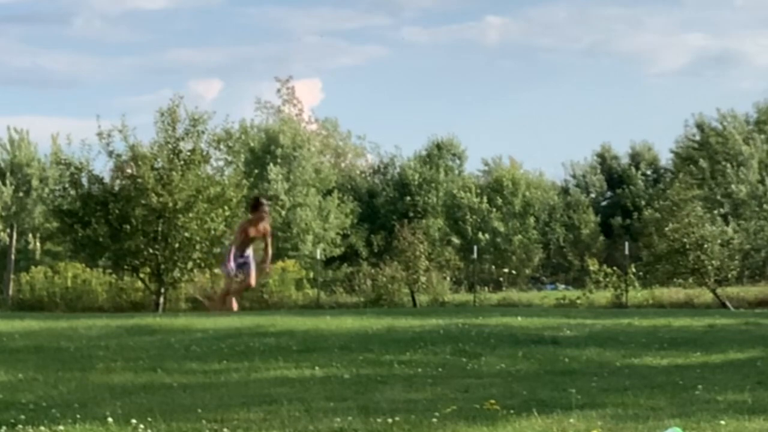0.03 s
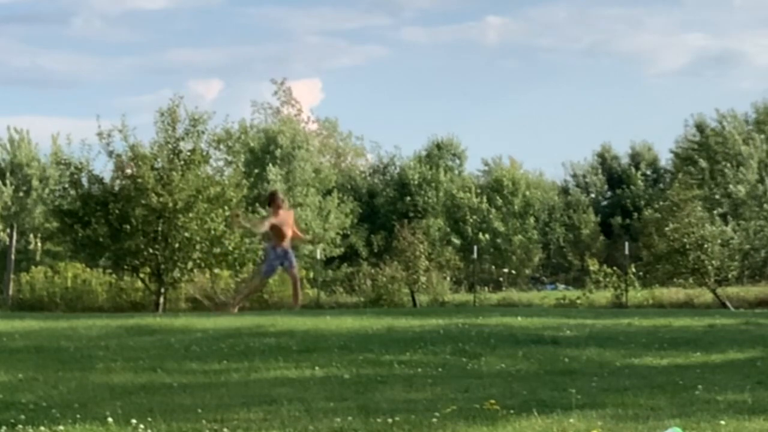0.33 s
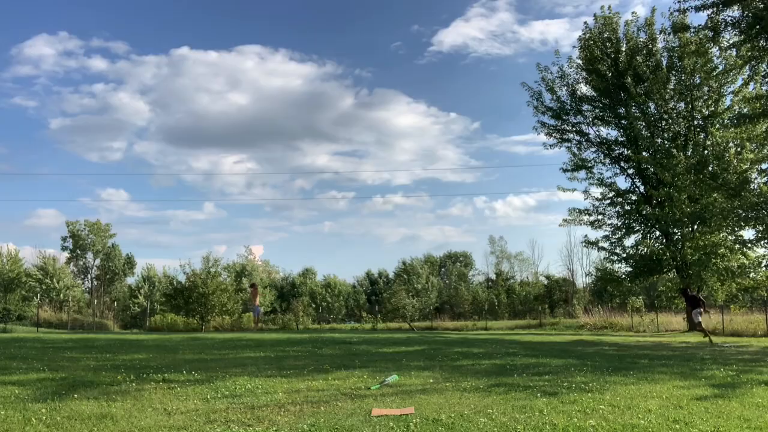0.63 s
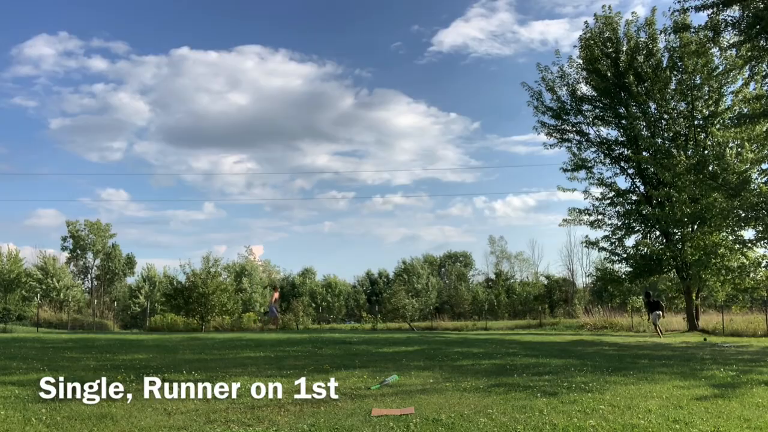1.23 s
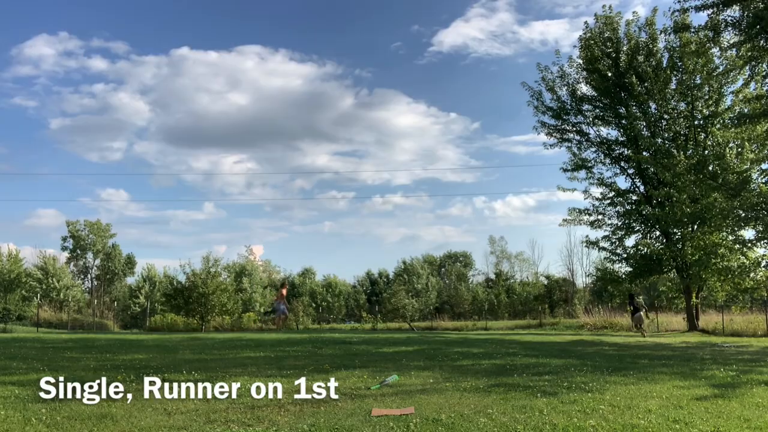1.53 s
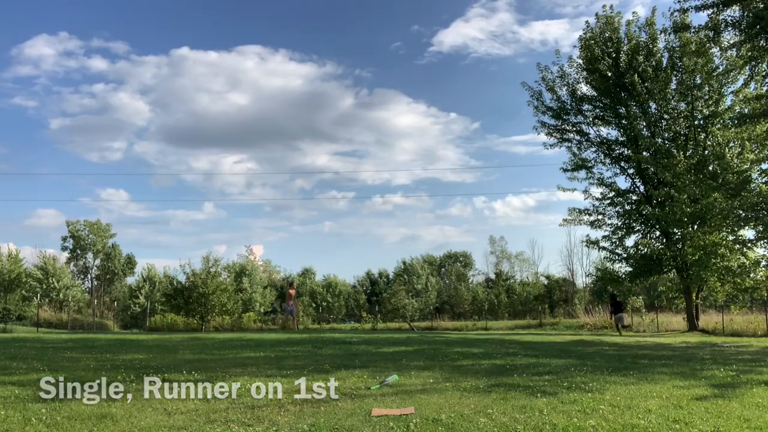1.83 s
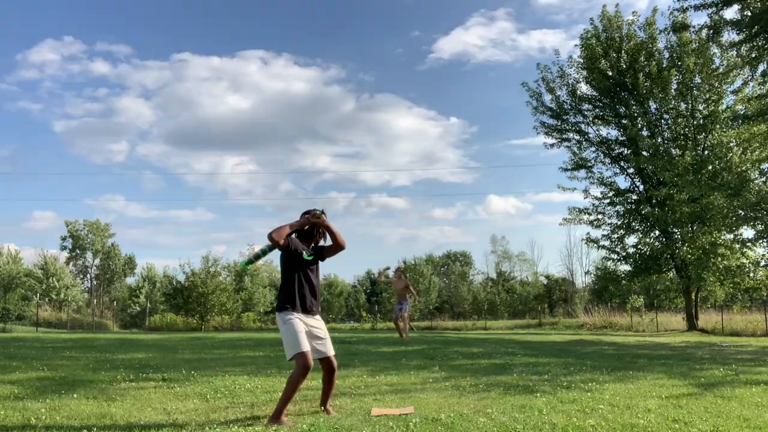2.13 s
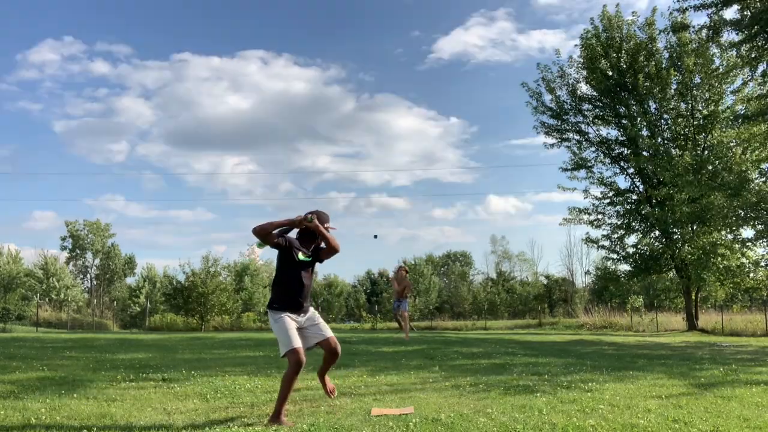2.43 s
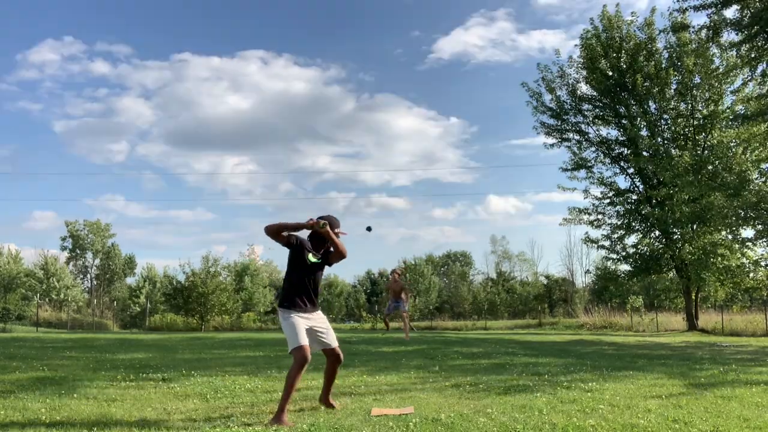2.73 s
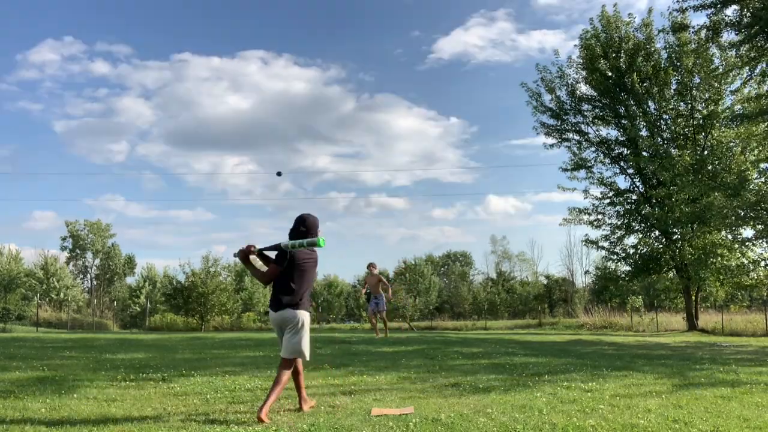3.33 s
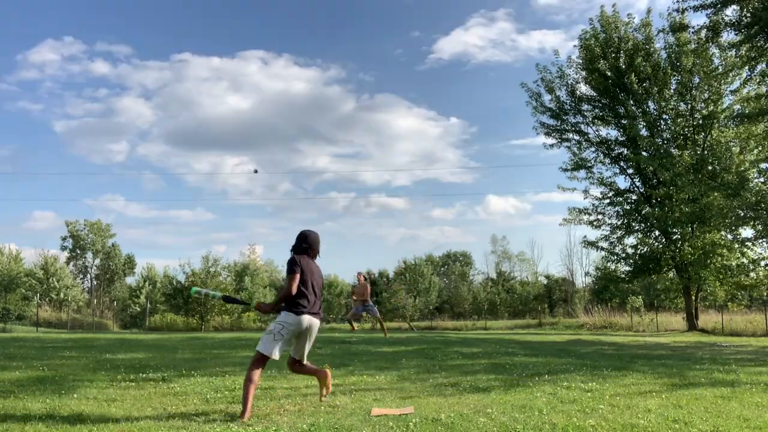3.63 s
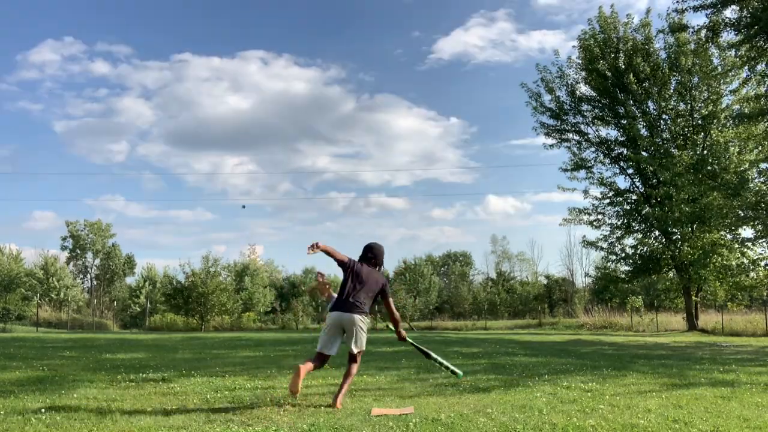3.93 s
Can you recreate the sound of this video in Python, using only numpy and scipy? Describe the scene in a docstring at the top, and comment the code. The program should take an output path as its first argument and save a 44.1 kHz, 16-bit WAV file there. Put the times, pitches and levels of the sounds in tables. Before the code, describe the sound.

One sharp, close crack of a bat on a plastic ball comes near the end, echoing briefly. Soft barefoot steps on a lawn come before and after, over faint crickets, a fading far engine and low outdoor rumble.

```python
"""A bat cracks a hollow plastic ball: both ring for a moment, and lawn and trees scatter the sound back.
Bare feet thud on the summer lawn and swish through the grass. Crickets trill, one pulse to a wing stroke.
Far off, an engine hums and slows, a faint tone pulses and a low drone comes up.
The open air rumbles and hisses under it all. Halfway through, the whole sound dips briefly."""
import sys
import numpy as np
from scipy import signal
from scipy.fft import rfft, irfft, next_fast_len
from scipy.io import wavfile
from scipy.ndimage import map_coordinates

SR = 44100
rng = np.random.default_rng(int(sys.argv[2]) if len(sys.argv) > 2 else 0)


def dump_mix(stems):
    """Bounce the given channels to the path in sys.argv[1] as a 16-bit WAV at rate SR."""
    frames = np.atleast_2d(stems).T  # one column per channel
    limited = np.clip(frames, -1, 1)  # hard clip at full scale
    pcm = np.round(limited * 32767).astype(np.int16)
    wavfile.write(sys.argv[1], SR, pcm)


N = 176400
T = np.arange(N) / SR
HIT_S, DIP_S = 3.0505, 2.003  # when the bat meets the ball; when the sound dips

# The notes that ball and bat ring with (pitch [Hz], level [dB], time to fade by 60 dB [s])
RING_NOTES = [(238, -20, .034), (363, -9.7, .02), (683, -9, .0105), (1022, -2.5, .016), (1222, 3.8, .0085),
              (1470, -17, .014), (1744, -12, .026), (2200, -17, .016), (2610, 2.5, .005),
              (2790, -15.5, .019), (3390, -14, .018), (3535, -21.5, .029), (4260, -22, .011),
              (4435, -12, .0086), (4755, -27, .018), (5540, -28, .028), (5690, -27, .017),
              (6900, -21, .0115), (7450, -18.5, .0125)]
# The tone colour of the crack: how strong its lows and highs are (frequency [Hz], level [dB])
CRACK_COLOUR = [(200, -24), (520, -21), (900, 2), (1500, -4.5), (3000, -8), (3700, -20), (4500, -11),
                (6200, -19), (7500, -2.5), (9000, -12.5), (10700, -4.5), (12200, -6), (13200, -4),
                (15200, -2.5), (16500, -13.5)]
# The colour of the sound bouncing off the ground close by (frequency [Hz], level [dB])
LAWN_COLOUR = [(200, -24), (520, -23.5), (900, 7.5), (1500, 0), (3000, -4), (4500, -4), (6200, -10),
               (7500, -1), (9000, -12), (11000, -3), (15000, -4.5), (16500, -14)]

def bat_hit():
    """The blow rings the hollow plastic for a few hundredths of a second, under a sharp crack."""
    ring = np.zeros(N)
    for hz, db, fade_s in RING_NOTES:
        start = HIT_S + 1 / hz  # low notes start later and swell more slowly
        envelope = burst(start, rise_s=2.36 / hz, fade_s=fade_s)
        ring += amp(db) * envelope * np.sin(2 * np.pi * hz * (T - start))
    crack = amp(-13.5) * burst(HIT_S, rise_s=0.00038, fade_s=0.0094) * noise(CRACK_COLOUR)
    lawn = amp(-25.5) * burst(HIT_S, rise_s=0.0021, fade_s=0.052) * noise(LAWN_COLOUR)
    return ring + crack + lawn


# How strongly the trees answer (time after the hit [s], level [dB])
ECHO_LEVEL = [(0, -11), (.02, -1), (.043, -8.5), (.065, -0.5), (.095, -4), (.118, -11.5), (.155, -8),
              (.18, -20), (.33, -56)]
# The colour of their echo (frequency [Hz], level [dB])
ECHO_COLOUR = [(300, -2.5), (700, -6.5), (1000, -1.5), (1450, -21), (1950, 5), (2200, -0.5), (3200, -0.5),
               (3520, 2.5), (3850, 0.5), (6400, -5), (8000, -4), (11000, -4), (15300, -12), (16500, -26)]
# The ring of the plastic inside the echo (pitch [Hz], width [Hz], level [dB])
ECHO_NOTES = [(1000, 110, -61), (1940, 200, -60), (3480, 300, -54)]
# That ring swells with the main echo (time after the hit [s], gain [factor])
ECHO_RING_SWELL = [(.045, 0.012), (.07, 0.67), (.098, 0.6), (.125, .25), (.18, 0.016)]

def tree_echo(blow):
    """Leaves and trunks return a bright, blurred echo that still rings, with one faint slap in it."""
    answer = amp(curve(ECHO_LEVEL, T - HIT_S)) * (T > HIT_S)
    leaves = amp(-48.5) * answer * noise(ECHO_COLOUR)
    side_tilt = [(4000, 5), (9000, -3), (13000, -24)]  # (frequency [Hz], level [dB])
    sides = amp(-50.5) * answer * filtered(noise(ECHO_COLOUR), lambda hz: amp(along(side_tilt, hz)))
    # The trunks send back many small copies of the blow, each with its own delay.
    paths = rng.standard_normal(SR // 2) * amp(curve(ECHO_LEVEL, T[:SR // 2]))
    trunks = amp(-33.5) * signal.fftconvolve(blow, paths / np.linalg.norm(paths))[:N]
    # The slap is one distinct copy from far away, late and thin.
    slap_delay_s = 0.156
    slap_tilt = [(1000, -17), (6000, 1)]  # (frequency [Hz], level [dB])
    slap = filtered(blow, lambda hz: amp(along(slap_tilt, hz)) * np.exp(-2j * np.pi * hz * slap_delay_s))
    notes = sum(amp(db) * fuzzy_tone(hz, width) for hz, width, db in ECHO_NOTES)
    ring = curve(ECHO_RING_SWELL, T - HIT_S) * notes
    return microphones(leaves + trunks + ring + amp(-33) * slap) + wide(0, sides)


# Bare feet landing (time [s], level [dB], pitch [Hz])
FOOTFALLS = [(.244, -44.5, 219), (.51, -50.5, 223), (0.865, -42.5, 174), (1.174, -45, 173),
             (1.191, -39.5, 85.6), (1.514, -34.5, 158.4), (1.854, -43.5, 146), (3.055, -34.5, 92),
             (3.338, -45, 85.6), (3.82, -44, 95.6)]
# The colour of the scuff in each step (frequency [Hz], level [dB])
SCUFF_COLOUR = [(60, -10), (300, -3.5), (500, -16), (900, -13.5), (1600, -23), (5000, -50)]
# Swishes through the grass (time [s], level [dB], rise and fall time [s])
GRASS_SWISHES = [(0.566, -71, 0.065), (1.053, -63, 0.0078), (1.435, -76, 0.023), (3.557, -73, 0.04),
                 (3.819, -72, 0.029), (3.906, -58, 0.017)]
# The colour of brushed blades of grass (frequency [Hz], level [dB])
GRASS_COLOUR = [(1500, -11), (6000, 5), (10000, 2), (15000, 3), (16500, -11)]
# The colour of a foot dragging over turf (frequency [Hz], level [dB])
DRAG_COLOUR = [(200, -13), (550, 3), (1000, -7), (1450, -4), (2500, -9), (6000, -32)]

def feet():
    """Each step thumps and scuffs, grass swishes, and the batter's foot drags after the swing."""
    extra_pitch, settle_s = 1.62, 0.0019  # a thump starts high and quickly falls to its pitch
    scuff = amp(-14.5) * noise(SCUFF_COLOUR)
    thuds = np.zeros(N)
    for start, db, hz in FOOTFALLS:
        age = np.maximum(T - start, 0)
        cycles = hz * (age + extra_pitch * settle_s * (1 - np.exp(-age / settle_s)))
        thump = np.sin(2 * np.pi * cycles)
        thuds += amp(db) * burst(start, rise_s=0.003, fade_s=0.079) * (thump + scuff)
    drag = amp(-60) * peak(3.54, slope_s=0.036) * noise(DRAG_COLOUR)
    swishes = sum(amp(db) * peak(time, slope_s) for time, db, slope_s in GRASS_SWISHES)
    rustle = unit(noise(GRASS_COLOUR) * amp(3.4 * wobble(300)))
    return microphones(thuds + drag + swishes * rustle)


# Many far crickets blurred together (frequency [Hz], level [dB])
CHORUS_COLOUR = [(3800, -54), (4700, -8.5), (5050, -3.5), (5420, 0), (5650, -3.5), (5950, -23),
                 (6500, -67.5)]
# Nearer insects (start [s], end [s], pitch [Hz], wing strokes [per s], level [dB])
NEAR_INSECTS = [(-.5, 4.5, 8270, 17, -66), (1.938, 3.75, 7540, 15.4, -62), (-.5, 4.5, 5400, 13, -68)]
# Single chirps of one more insect (time [s], level [dB])
LONE_CHIRPS = [(1.29, -64), (1.356, -68), (1.59, -65), (1.626, -61)]

def crickets():
    """A far chorus shimmers behind a few nearer insects, which make one short pulse per wing stroke."""
    chorus = amp(-66.5 + 1.1 * wobble(40)) * wide(noise(CHORUS_COLOUR), amp(1) * noise(CHORUS_COLOUR))
    near = pulses(LONE_CHIRPS, half_width_s=0.0085) * fuzzy_tone(hz=4930, width_hz=130)
    for start, end, hz, rate, db in NEAR_INSECTS:
        stroke_count = rate * T + 0.091 * wobble(3.96)
        strokes = np.sin(np.pi * stroke_count) ** 8  # the high power keeps each pulse short
        fade = np.clip(np.minimum(T - start, end - T) / 0.15, 0, 1)  # 0.15 s in and out
        song = tone(hz * (1 + 0.01 * wobble(90)))
        near += amp(db + 2.1 * wobble(9.4)) * fade * strokes * song
    return chorus + microphones(near)


# The hum of a far engine (time [s], pitch [Hz], level [dB])
ENGINE_HUM = [(0, 67.14, -49.5), (.9, 66.64, -49), (1.1, 62.95, -55), (1.4, 54, -59.5),
              (1.95, 54.97, -54.5), (2.15, 57.35, -71.5), (4, 59.3, -86)]

def engine():
    """A far engine fires fast enough to make a low, unsteady tone, which sinks and fades."""
    hum = np.sqrt(2) * tone(curve(ENGINE_HUM) * (1 + 0.0095 * wobble(12)))
    level_db = curve(ENGINE_HUM, column=2) + 2.25 * wobble(13.78)
    return microphones(amp(level_db) * hum)


# Faint, far pulses (time [s], level [dB])
WARBLE_PULSES = [(2.365, -69), (2.435, -69), (2.517, -67.5), (2.66, -67), (2.73, -70), (2.785, -69),
                 (2.875, -70)]

def warble():
    """A faint, blurred tone pulses far off before the hit."""
    return microphones(pulses(WARBLE_PULSES, half_width_s=0.028) * fuzzy_tone(hz=1100, width_hz=190))


# The colour of a fuzzy drone (frequency [Hz], level [dB])
DRONE_COLOUR = [(115, -30), (145, -8), (176, -1.5), (192, -9), (230, -20), (300, -51)]
# How the drone swells (time [s], level [dB])
DRONE_SWELL = [(0, -74.5), (2.2, -73), (2.45, -64.5), (3.6, -62), (4, -69)]

def drone():
    """A faint, low drone comes up in the distance."""
    return microphones(amp(curve(DRONE_SWELL)) * noise(DRONE_COLOUR))


# The colour of the low outdoor rumble (frequency [Hz], level [dB])
RUMBLE_COLOUR = [(20, -19.5), (40, -0.5), (60, 4), (95, 2.5), (130, -4), (180, -8), (225, -14), (300, -26),
                 (600, -68)]
# How the rumble rises and falls (time [s], level [dB])
RUMBLE_SWELL = [(0, -56.5), (1.2, -58), (1.85, -55.5), (2.15, -65.5), (2.5, -57), (2.85, -61.5), (3.3, -62),
                (3.6, -66), (4, -60.5)]
# The hiss of the air, in the centre and at the sides (frequency [Hz], level [dB])
CENTRE_HISS = [(100, -3.5), (450, -2.5), (1050, 1), (1600, -3.5), (3000, -1.5), (4300, -5.5), (6400, -13),
               (8200, -6), (9200, -33.5), (10400, -42), (11500, -26.5), (15300, -30), (16200, -51.5)]
SIDE_HISS = [(100, 4), (450, -4), (750, 4.5), (1700, -2.5), (3400, -2.5), (4300, -6), (6300, -12.5),
             (7400, -2.5), (8400, 4), (9300, -17.5), (11500, -26), (14000, -48)]
# Extra hiss, dull before the dip and bright after it (frequency [Hz], level [dB])
EARLY_HISS = [(300, -19), (600, -4.5), (900, 4), (1500, -0.5), (2400, -12.5), (5000, -52)]
LATE_HISS = [(1000, -34), (2000, -1), (3000, 2.5), (4300, -3.5), (6500, -5), (8000, -8.5), (9500, -45),
             (14000, -36.5)]

def air():
    """The open field rumbles and hisses, duller before the dip and brighter after it."""
    rumble_db = curve(RUMBLE_SWELL) + 1.6 * wobble(9.8)
    rumble = amp(rumble_db) * wide(noise(RUMBLE_COLOUR), amp(-4.5) * noise(RUMBLE_COLOUR))
    hiss = wide(amp(-63.5) * noise(CENTRE_HISS), amp(-60) * noise(SIDE_HISS))
    dull = amp(-68.5) * wide(noise(EARLY_HISS), noise(EARLY_HISS))
    bright = amp(-67.5) * wide(noise(LATE_HISS), noise(LATE_HISS))
    waver = amp(0.31 * wobble(4.89))
    return rumble + waver * (hiss + np.where(T < DIP_S, dull, bright))


# How left and right hear a source (frequency [Hz], left ahead by [radians], left louder by [dB])
MICROPHONE_PAIR = [(100, 0, -3), (380, -.2, -4), (750, -.1, .5), (1300, -.3, -1.5), (3400, -.5, -1.5),
                   (4500, -.6, -3), (5700, -1, -3), (6800, 1.2, -2), (7400, 2.2, -3.5), (8400, 2.75, -3),
                   (9700, 3.5, -2), (10700, 4.9, 0), (14000, 6.3, .5)]

def microphones(x):
    """One source reaches two microphones with slightly different timing and strength."""
    share = np.array([[0.5], [-0.5]])  # half to the left, the opposite half to the right
    def response(hz):
        timing = np.exp(1j * share * along(MICROPHONE_PAIR, hz))
        return timing * amp(share * along(MICROPHONE_PAIR, hz, column=2))
    return filtered(x, response)


def amp(db):
    """Turn decibels into a number to multiply by."""
    return 10 ** (np.asarray(db) / 20)


def unit(x):
    """Scale a sound to an average strength (rms) of 1."""
    return x / np.sqrt(np.mean(x ** 2) + 1e-20)


def along(table, hz, column=1):
    """Read a table between its frequencies, on a scale of octaves."""
    columns = np.transpose(table)
    return np.interp(np.log(hz + 1), np.log(columns[0] + 1), columns[column])


def curve(table, t=T, column=1):
    """Join a table's points in time with straight lines."""
    columns = np.transpose(table)
    return np.interp(t, columns[0], columns[column])


def wobble(rate):
    """A smooth curve through `rate` random values a second."""
    return map_coordinates(rng.standard_normal(400), [T * rate], mode="mirror")


def filtered(x, response):
    """Multiply each frequency in x by response(frequency)."""
    size = next_fast_len(N + SR // 2)
    return irfft(rfft(x, size) * response(np.fft.rfftfreq(size, 1 / SR)), size)[..., :N]


def noise(colour):
    """Noise of strength 1 with the given tone colour."""
    return unit(filtered(rng.standard_normal(N), lambda hz: amp(along(colour, hz))))


def tone(hz):
    """A pure tone that follows a changing pitch."""
    return np.sin(2 * np.pi * np.cumsum(hz) / SR)


def fuzzy_tone(hz, width_hz):
    """A blurred tone of strength 1: noise close to one pitch."""
    return unit(filtered(rng.standard_normal(N), lambda f: np.exp(-2 * ((f - hz) / width_hz) ** 2)))


def burst(start, rise_s, fade_s):
    """A loudness shape that swells, then dies away by 60 dB every fade_s."""
    age = np.maximum(T - start, 0)
    return (1 - np.exp(-age / rise_s)) * amp(-60 * age / fade_s)


def peak(time, slope_s):
    """A loudness shape that climbs to a sharp point and falls again."""
    return np.exp(-np.abs(T - time) / slope_s)


def pulses(table, half_width_s):
    """A loudness shape of short, rounded bumps."""
    return sum(amp(db) * np.exp(-((T - time) / half_width_s) ** 2) for time, db in table)


def wide(centre, sides):
    """Turn centre and sides into left and right."""
    return np.array([centre + sides, centre - sides])


def scene():
    """The hit and its echo over the life of the lawn."""
    blow = bat_hit()
    return (microphones(blow) + tree_echo(blow) + feet()
            + engine() + drone() + warble() + air() + crickets())


def record(dry):
    """The level dips briefly, and the very highest treble is cut off."""
    dip_db, top_hz = -29, 16400
    dip = amp(dip_db * peak(DIP_S, slope_s=0.011))
    return filtered(dry * dip, lambda hz: 1 / (1 + (hz / top_hz) ** 120))


dry = scene()
out = record(dry)
dump_mix(out)
```